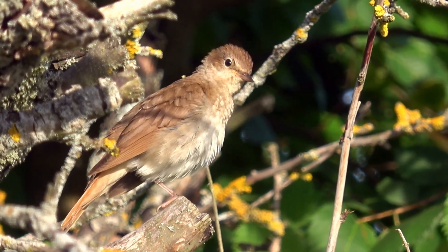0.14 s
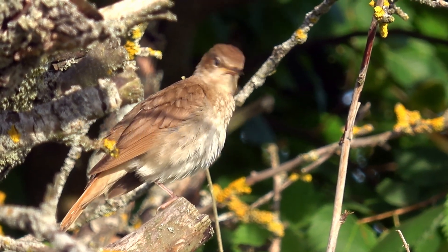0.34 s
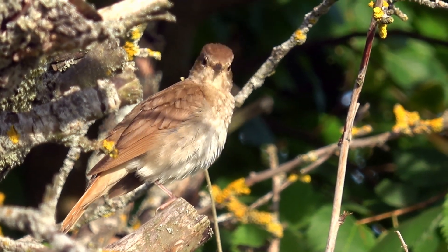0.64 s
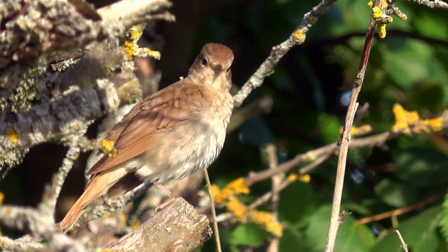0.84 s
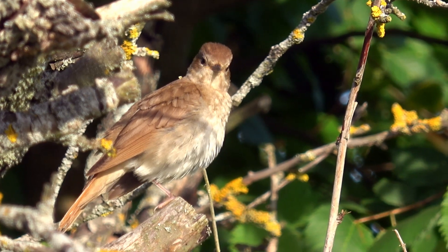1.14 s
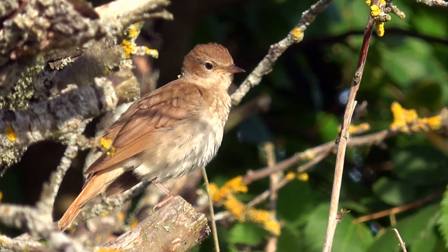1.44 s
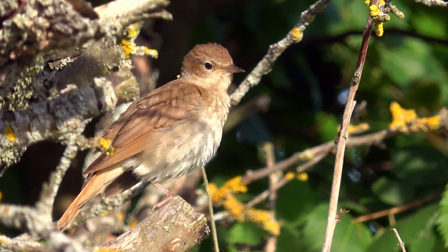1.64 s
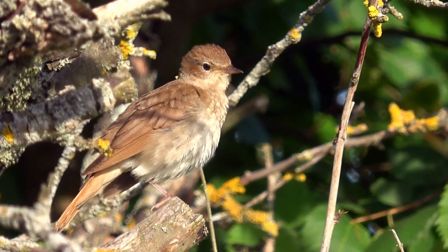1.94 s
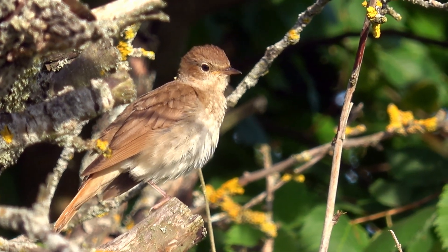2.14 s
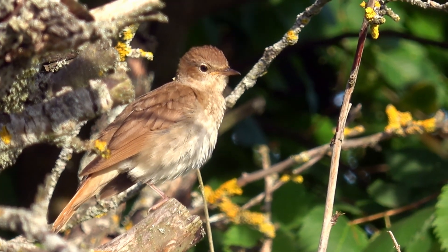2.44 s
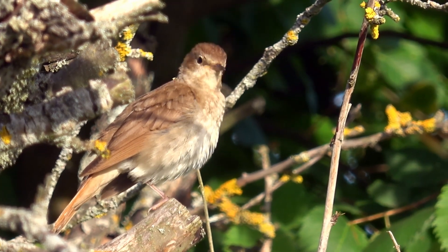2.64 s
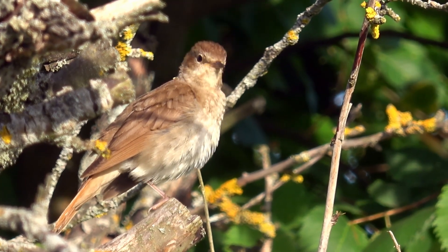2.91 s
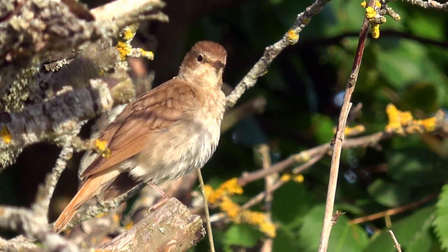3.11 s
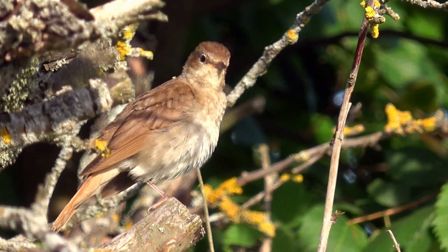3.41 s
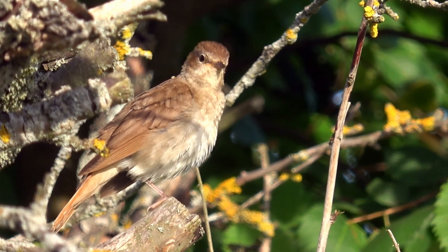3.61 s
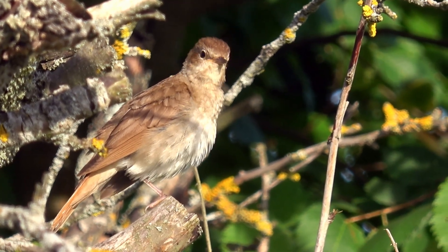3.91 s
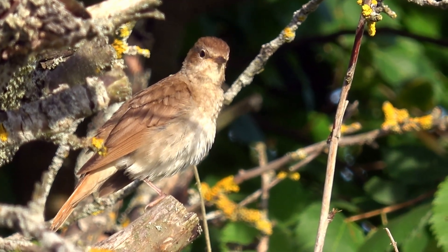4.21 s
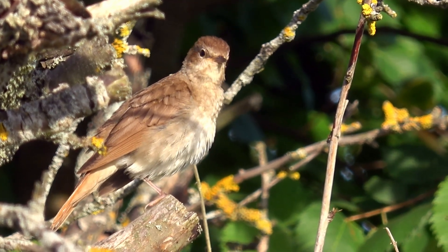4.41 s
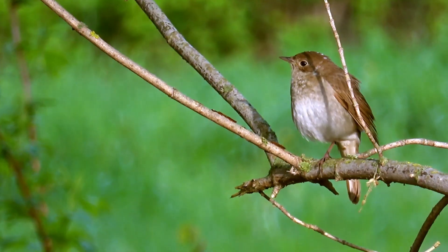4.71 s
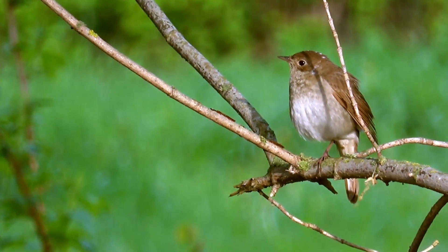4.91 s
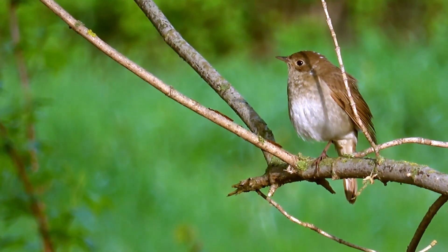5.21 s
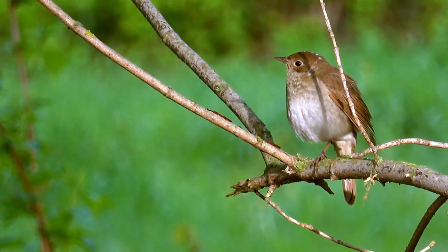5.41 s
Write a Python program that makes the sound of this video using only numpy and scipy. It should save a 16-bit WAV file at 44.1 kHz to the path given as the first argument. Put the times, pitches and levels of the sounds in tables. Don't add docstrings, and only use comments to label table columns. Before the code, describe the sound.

Outdoors among trees, a clear stereo microphone catches a foreground songbird giving piercing slurred whistles, sharp clicks and an even machine-like rattle, with gaps between them. Softer neighbours fill the gaps with two-toned notes, raspy chacks and mellow low coos. After the rattle come raspy chups and grumbling calls, falling high seeps on the right, a short leaf gust and small twitters above a rising traffic hum.

```python
import sys
import numpy as np
from scipy import signal
from scipy.io import wavfile
from scipy.ndimage import uniform_filter1d

SR = 44100
rng = np.random.default_rng(int(sys.argv[2]) if len(sys.argv) > 2 else 0)


def unload_wav(signal):
    wavfile.write(
        sys.argv[1],
        SR,
        np.round(np.clip(np.atleast_2d(signal).T, -1, 1) * 32767).astype(np.int16),
    )


def natural_amplitude(level_db):
    exponent = np.asarray(level_db, float) / 20
    return 10 ** exponent


N = 244755
LEAD = 8192


def read(points, hz):
    f, value = np.transpose(points)
    return np.interp(np.log(hz + 1), np.log(f + 1), value)


def evened(x):
    return x / np.sqrt(np.mean(x ** 2) + 1e-20)


def level_curve(points, before_db=None):
    return natural_amplitude(np.interp(np.arange(N) / SR, *np.transpose(points), left=before_db))


def tilt(db):
    return natural_amplitude(np.multiply([[0.5], [-0.5]], db))


def wander(count, size, pool):
    return evened(uniform_filter1d(rng.standard_normal(pool), size=size))[:count]


def silence():
    return np.zeros(N + LEAD)


def add(mix, s, sound):
    part = mix[round(s * SR) + LEAD:][:len(sound)]
    part += sound[:len(part)]


# frequency in Hz, left-right likeness from 0 to 1.
EAR_LIKENESS = [(30, 0.99), (70, 0.93), (105, 1), (150, 0.48), (380, 0.82), (950, 0.87), (2400, 0.89),
                (6000, 0.48), (15000, 0.42)]


def air(spectrum, patchy_db, likeness=1, size=1024):
    frames, hz = 4 * N // size + 5, np.fft.rfftfreq(size, 1 / SR)
    a, b, c, d, patches = rng.standard_normal((frames, len(hz), 5)).T
    patches = uniform_filter1d(patches, size // 72, 0)
    patches = evened(uniform_filter1d(patches, 12288 // size, 1))
    same = np.clip(likeness * read(EAR_LIKENESS, hz), 0, 1)[:, None]
    left = a + 1j * b
    right = same * left + np.sqrt(1 - same ** 2) * (c + 1j * d)
    z = np.array([left, right]) * natural_amplitude(read(spectrum, hz)[:, None] + patchy_db * patches)
    return evened(signal.istft(z, nperseg=size, noverlap=size * 3 // 4)[1][:, :N])


# frequency in Hz, level in dB per Hz.
HUM_SPECTRUM = [(18, -16), (35, -0.5), (56, 3), (97, -7), (170, -13), (300, -10.5), (677, -4), (936, -9),
                (1260, -7.5), (1840, -18), (3700, -20), (5100, -25), (8000, -23.5), (16000, -29)]
# time in seconds, level in dB.
HUM_FADE = [
    (4.1, -6.5),
    (4.7, -11.5),
    (5.55, -9),
]


def traffic_hum():
    return natural_amplitude(-49.5) * level_curve(HUM_FADE) * air(HUM_SPECTRUM, 0.59, size=4096) * tilt(0.8)


# frequency in Hz, level in dB per Hz.
SWELL_SPECTRUM = [(18, -41), (30, -4), (93, 0.5), (197, -14.5), (536, -1.5), (1110, 1), (1880, -10),
                  (3430, -7), (5660, -16), (7640, -27), (12000, -73), (15600, -69), (22000, -120)]
# time in seconds, level in dB.
SWELL_LEVEL = [
    (4.15, -65.5),
    (4.34, -56),
    (4.97, -48.5),
    (5.55, -48.5),
]


def traffic_swell():
    return natural_amplitude(2.5) * level_curve(SWELL_LEVEL, -99) * air(SWELL_SPECTRUM, 0.93, size=4096) * tilt(-1.6)


# frequency in Hz, level in dB per Hz.
LEAVES_SPECTRUM = [(880, -18), (1500, 2.5), (2360, 4), (5400, 4), (6550, -2.5), (8020, -12.5),
                   (9910, -19.5), (15000, -28)]
# time in seconds, level in dB.
GUST_LEVEL = [
    (4.2, -58),
    (4.6, -69),
    (4.8, -49),
    (4.95, -45.5),
    (5.0, -38),
    (5.06, -41.5),
    (5.15, -49),
    (5.3, -60),
    (5.55, -92),
]


def gust_in_leaves():
    return level_curve(GUST_LEVEL, -99) * air(LEAVES_SPECTRUM, 1.8, likeness=1.1) * tilt(-3.6)


# frequency in Hz, level in dB per Hz.
CHORUS_SPECTRUM = [(1800, -3.5), (2600, -2), (3700, 2), (4800, -3), (6500, -10), (8000, -23)]
# time in seconds, level in dB.
CHORUS_LEVEL = [(0, -51), (.2, -58.5), (.56, -60), (1.0, -55.5), (1.35, -59), (1.7, -62), (2.2, -54),
                (2.45, -58), (3.1, -61.5), (3.9, -63), (4.3, -58.5), (5.55, -82)]


def far_chorus():
    return natural_amplitude(-0.5) * level_curve(CHORUS_LEVEL) * air(CHORUS_SPECTRUM, 5.2)


def resonate(x, hz, width_hz):
    return signal.lfilter(*signal.iirpeak(hz, hz / width_hz, SR), x)


def sing(hz, overtones_db):
    turn = 2 * np.pi * np.cumsum(hz) / SR
    tone = 0
    for k, db in enumerate(overtones_db, 1):
        tone = tone + natural_amplitude(db) * np.sqrt(2) * np.sin(k * turn) * (k * hz < SR / 2)
    return tone


def whistle(rows, overtones_db, follow=0.22):
    s, hz, level_db = np.transpose(rows)
    t = np.arange(s[0], s[-1], 1 / SR)
    hz, level_db = (uniform_filter1d(np.interp(t, s, c), size=160, mode="nearest") for c in (hz, level_db))
    pure = sing(hz, [0])
    upper = (sing(hz, overtones_db) - pure) * natural_amplitude((1 - follow) * (level_db.max() - level_db))
    flutter = 0.84 + 0.45 * wander(len(t), 140, 6000)
    return natural_amplitude(level_db) * (pure + upper * flutter) * signal.windows.tukey(len(t), .1)


def arc(length, start_hz, middle_hz, end_hz, db, overtones_db, soft=0.88, late=1, rough=0.58):
    u = np.linspace(0, 1, round(length * SR))
    v = u ** late
    hz = start_hz * (1 - v) * (1 - 2 * v) + 4 * middle_hz * v * (1 - v) + end_hz * v * (2 * v - 1)
    shake = 1 + rough * wander(len(u), 120, 12000)
    return natural_amplitude(db) * sing(hz, overtones_db) * shake * signal.windows.tukey(len(u), min(soft, 1))


def chack(db, length, hz, width_hz, per_s, rough=1.0):
    t = np.arange(round(length * SR)) / SR
    cycle = t * per_s * (1.05 - .05 * t / length) % 1
    noise = rough * width_hz / 800 * rng.standard_normal(4096)[:len(t)]
    drive = np.exp(-cycle / 0.11) * (noise + np.sin(2 * np.pi * hz * cycle / per_s))
    ring = resonate(resonate(drive, hz, width_hz), hz, 2.5 * width_hz)
    dull = signal.lfilter(*signal.butter(4, max(7500, hz), fs=SR), ring)
    return natural_amplitude(db) * evened(dull) * signal.windows.tukey(len(t), .5)


# start in seconds, length in seconds,
# start pitch in Hz, end pitch in Hz, level in dB.
LEFT_PEEPS = [(0.085, 0.02, 1790, 1840, -54), (0.224, 0.043, 3550, 3880, -67),
              (0.562, 0.012, 2650, 1730, -46.5), (0.576, 0.03, 4120, 3990, -63),
              (0.619, .018, 3520, 3920, -61.5), (0.686, 0.012, 2400, 2840, -55.5),
              (0.808, 0.014, 3430, 3300, -60), (0.836, 0.048, 3320, 3313, -58.5),
              (0.907, 0.022, 3300, 3800, -72), (0.94, .04, 3900, 3950, -80),
              (1.193, 0.036, 2860, 3060, -64), (1.288, 0.11, 3930, 3620, -68),
              (1.834, 0.027, 4460, 4750, -63), (1.834, 0.038, 6200, 6650, -66),
              (1.865, 0.018, 4800, 5050, -59), (1.89, 0.0046, 5000, 5050, -63),
              (1.907, 0.0039, 4900, 4930, -55), (2.244, 0.011, 2880, 2900, -65),
              (3.227, .025, 3560, 4000, -62)]
WARBLE = [(2.644, 0.015, 5740, 5510, -56), (2.668, 0.013, 7370, 5200, -60), (2.686, 0.028, 4140, 6460, -62),
          (2.698, 0.0059, 4800, 6000, -52), (2.875, 0.027, 4430, 6240, -63.5),
          (2.951, 0.043, 8530, 5660, -56.5), (2.979, 0.01, 5600, 7950, -60),
          (3.005, 0.02, 8100, 6400, -64.5), (3.03, 0.01, 4860, 7500, -60), (3.037, 0.023, 4740, 5700, -63)]
RIGHT_PEEPS = [(4.2, 0.06, 4370, 3760, -65), (4.333, 0.053, 3550, 2780, -58), (4.4, 0.024, 4950, 5100, -60),
               (4.472, 0.053, 5130, 5270, -62.5), (4.504, 0.028, 4060, 3620, -52.5),
               (4.552, .018, 2470, 3220, -56.5), (4.567, 0.046, 3350, 3330, -57.5),
               (4.62, 0.024, 3560, 4190, -55), (4.969, 0.068, 9280, 9580, -61),
               (5.179, 0.039, 3450, 3220, -54), (5.215, 0.065, 3410, 3330, -57),
               (5.22, 0.012, 4500, 3530, -49), (5.47, 0.011, 3560, 3300, -53),
               (5.49, 0.025, 6880, 6780, -69),
               (5.212, 0.025, 5900, 5260, -55), (5.293, .01, 3640, 6260, -63),
              (5.304, 0.036, 6220, 5480, -54), (5.33, 0.015, 6300, 7700, -64),
              (5.385, .015, 5650, 6330, -61), (5.396, 0.019, 5900, 4880, -52),
              (5.419, 0.0075, 3250, 4120, -54), (5.46, 0.014, 4970, 6200, -59),
              (5.48, 0.016, 5800, 4700, -50.5), (5.495, 0.011, 3100, 4420, -47.5),
              (5.538, 0.013, 3950, 6200, -60)]


def peeps(notes):
    out = silence()
    for s, length, start_hz, end_hz, db in notes:
        settle = 0.62 + 0.094 * (end_hz < start_hz)
        middle_hz = start_hz + settle * (end_hz - start_hz)
        add(out, s, arc(length, start_hz, middle_hz, end_hz, db, [0], soft=0.25, rough=.24))
    return out


# start in seconds, length in seconds, top pitch in Hz, level in dB.
SEEPS = [
    (4.714, 0.057, 7960, -43),
    (4.821, 0.054, 7870, -40),
    (4.948, .055, 7280, -32),
]
# share of the length, times the top pitch, level in dB.
SEEP_SHAPE = [(0, 0.97, -12), (.2, 0.99, -7), (.66, .9, 0.5), (1, .73, -6.5)]


def seeps():
    out = silence()
    share, pitch, level_db = np.transpose(SEEP_SHAPE)
    for s, length, hz, db in SEEPS:
        add(out, s, whistle(np.transpose([share * length, pitch * hz, level_db + db]), [-1.5, -59]))
    return out


# start in seconds, level in dB, length in seconds.
SCOLD = (3070, 3000, 340), [(.992, -52.5, 0.034), (1.062, -51, 0.03)]
GRUMBLE = (2240, 1200, 450, 1.7), [(4.328, -54.5, 0.023), (4.392, -53, 0.028), (4.472, -51.5, 0.03),
           (4.548, -50, 0.019), (4.624, -51, 0.025), (4.706, -54, 0.019)]
GRUMBLE_TOP = (6000, 5300, 350), [(4.4, -58, 0.015), (4.47, -61, .025), (4.548, -58, 0.02),
               (4.632, -60, 0.0166), (4.71, -61, .02)]
SHARP = (1960, 850, 140), [(4.981, -37, 0.0103), (5.008, -41, 0.017)]
SHARP_TOP = (4740, 730, 710), [(4.982, -37, 0.0083), (5.008, -40, 0.012)]
CHACK = (2950, 1700, 400), [(.746, -51, .02), (2.073, -50, .015), (2.119, -53, .017), (2.165, -57, .025)]
HISS = (4000, 2700, 400), [(.125, -58, 0.046), (.161, -57, 0.026), (.506, -43.5, 0.024),
        (1.228, -62, 0.034)]
TACK = (2250, 800, 180), [(.562, -49, .0087)]
TUT = (1590, 560, 340), [(1.207, -50.5, 0.014), (1.468, -48.5, 0.021), (1.72, -50, 0.014)]
TICK = (6000, 1200, 630), [(2.335, -67, 0.025), (2.397, -58, .015), (2.467, -60, 0.018)]
CHURR = (5100, 1800, 120), [(1.585, -63, 0.067)]
TSK = (9300, 900, 320), [(2.218, -65, .012)]
TRILL = (3700, 330, 62, .4), [(2.146, -60, .09)]
BUZZ = (2900, 420, 75, .5), [(5.325, -54, .066), (5.392, -56, .066)]


def harsh_calls():
    out = silence()
    kinds = (SCOLD, GRUMBLE, GRUMBLE_TOP, SHARP, SHARP_TOP, CHACK, HISS, TACK, TUT, TICK, CHURR, TSK, TRILL, BUZZ)
    for voice, calls in kinds:
        for s, db, length in calls:
            add(out, s, chack(db, length, *voice))
    return out


CHUP = (2600, 950, 340, 1.2), [(3.867, -46, 0.018), (3.903, -49, 0.023), (3.950, -48, 0.019),
        (4.001, -48, 0.019), (4.054, -50, 0.021)]


def chups():
    out = silence()
    voice, calls = CHUP
    for s, db, length in calls:
        add(out, s, chack(db, length, *voice))
        add(out, s + .004, arc(length + .005, 2800, 2810, 2750, db - 3.5, [0], rough=0.23))
    return out


LOW_OVERTONES_DB = [2, -9, -24]
# start in seconds, length in seconds, top pitch in Hz, level in dB.
COOS = [
    (1.245, 0.053, 1310, -48),
    (1.505, 0.0567, 1210, -50.5),
    (1.754, 0.067, 1182, -50),
]
# start in seconds, length in seconds, start, middle and end pitch in Hz, level in dB.
HOOT = (.988, .044, 1080, 1330, 1200, -44.5)


def coos():
    out = silence()
    add(out, HOOT[0], arc(*HOOT[1:], [0, -15, -19], soft=.7, rough=.15))
    for s, length, hz, db in COOS:
        add(out, s, arc(length, .76 * hz, hz, 0.54 * hz, db, LOW_OVERTONES_DB, soft=0.47, rough=0.45))
    return out


# start in seconds, length in seconds, start, middle and end pitch in Hz, level in dB.
CROAK_ENTRY = [
    (3.1105, .0048, 1850, 1560, 1250, -43.5),
]
CROAK = [
    (3.116, .069, 960, 1180, 1190, -47.5),
]
CROAK_GRIT = (1250, 900, 174, .7), [(3.118, -54, .066)]


def croaks():
    out = silence()
    for s, *shape in CROAK_ENTRY:
        add(out, s, arc(*shape, LOW_OVERTONES_DB, rough=0.38))
    for s, *shape in CROAK:
        croak = arc(*shape, [0, -24], soft=.25, late=.6, rough=.25)
        beat = abs(np.sin(np.pi * 87 * (np.arange(len(croak)) / SR - .0045)))
        offbeat = arc(shape[0], *[1.52 * shape[2]] * 3, shape[-1] - 4, [0], rough=0.68)
        add(out, s, beat ** 5 * offbeat)
        add(out, s, croak * (1 - .9 * beat ** 1.3) * np.linspace(.85, 1.15, len(croak)))
    voice, calls = CROAK_GRIT
    for s, db, length in calls:
        add(out, s, chack(db, length, *voice))
    return out


# start in seconds, length in seconds, start, middle and end pitch in Hz, level in dB.
KNOCKS = [
    (.1738, .0036, 2800, 2200, 1600, -40),
    (.1788, .004, 2200, 1900, 1650, -43),
]
CAWS = [
    (2.172, .232, 700, 810, 735, -65.5),
]


def knocks_and_caws():
    out = silence()
    for s, *shape in KNOCKS:
        add(out, s, arc(*shape, [0], soft=0.71, rough=.1))
    for s, *shape in CAWS:
        add(out, s, 1.3 * arc(*shape, [0, 8, -7], soft=.2, rough=.12))
    return out


DUET_PARTIALS = [(1, 0), (0, 1), (2, 0), (1, 1), (4, -1), (3, 0), (-1, 2)]
DUET_PARTIALS_DB = [0.5, 5.5, -11, -6.5, -16, -19, -7]


def duet(db, length, low_hz, high_hz, high_db):
    joins, stops = .22, .8
    u = np.linspace(0, 1, round(length * SR))
    end = np.clip((u - stops) / (1 - stops), 0, 1)
    low_curve = low_hz * (1 - .24 * end ** 1.44)
    high_curve = high_hz * (1 - .07 * np.exp(-(u - joins) / 0.12) - 0.35 * end)
    low, high = (np.cumsum(hz) * 2 * np.pi / SR for hz in (low_curve, high_curve))
    joined = natural_amplitude(high_db) * np.clip((u - joins) / 0.04, 0, 1) * np.clip(1 - 0.83 * end, 0, 1)
    bright = natural_amplitude(9.4 * np.clip((u - stops) / 0.059 + 1, 0, 1))
    mix = 0
    for (a, b), g in zip(DUET_PARTIALS, DUET_PARTIALS_DB):
        partial = natural_amplitude(g) * np.sin(a * low + b * high)
        mix = mix + partial * (joined if b else 1) * (bright if a == 2 else 1)
    hoarse = 1 + .32 * wander(len(u), 50, 4096)
    note = natural_amplitude(db) * mix * hoarse * (0.82 + 1.5 * u) * signal.windows.tukey(len(u), .25)
    rasp = chack(db + 6, 0.018, 4700, 2900, 350)
    start = int(0.87 * len(u))
    return np.pad(note, (0, len(rasp))) + np.pad(rasp, (start, len(u) - start))


# start in seconds, level in dB, length in seconds, low voice in Hz, high voice in Hz.
DUETS = [
    (0.103, -52, 0.04, 3136, 4100),
    (0.412, -55, 0.041, 3115, 4185),
    (1.628, -53.5, 0.049, 3043, 4190),
    (2.036, -51, 0.024, 3033, 4130),
    (2.565, -52, 0.03, 3070, 3986),
    (3.087, -52.5, 0.037, 3160, 4240),
    (3.849, -53.5, 0.03, 2980, 4180),
]
DUETS_HIGH_DB = [-8, 0.5, -2.5, -4, -3, -3.5, 2.5]


def duets():
    out = silence()
    for (s, *shape), high_db in zip(DUETS, DUETS_HIGH_DB):
        add(out, s, duet(*shape, high_db))
    return out


# time in seconds, pitch in Hz, level in dB.
WHISTLES = [
    [(.265, 5970, -52), (.272, 6360, -50), (.289, 6530, -36), (.299, 6090, -23), (.31, 5090, -26.5),
     (.32, 4700, -25.5), (.33, 4655, -28), (.342, 4727, -31.5), (.354, 4700, -33)],
    [(.663, 6360, -51), (.675, 6560, -52), (.686, 6650, -37), (.697, 5950, -25), (.707, 5180, -28),
     (.715, 4950, -28), (.721, 4850, -18.5), (.731, 4780, -31), (.74, 4760, -54)],
    [(3.906, 4340, -48), (3.912, 5870, -25.5), (3.92, 6760, -35), (3.928, 7060, -46), (3.94, 6580, -29),
     (3.952, 6280, -34), (3.956, 5950, -17), (3.964, 5380, -36), (3.972, 5480, -37)],
]
# start in seconds, length in seconds,
# start, middle and end pitch in Hz, level in dB.
LATE_ECHO = (.046, .041, 4620, 4610, 4600, -54)
# start in seconds, length in seconds, start, middle, end pitch in Hz, level in dB.
LOWER_NOTES = [
    (0.274, 0.05, 3250, 3240, 3500, -59),
    (0.667, 0.028, 3090, 3350, 3540, -54.5),
]


def loud_whistles():
    out, overtones_db = silence(), [0, -35, -37]
    add(out, WHISTLES[0][0][0] - 0.37, natural_amplitude(-6.5) * whistle(WHISTLES[0], overtones_db))
    add(out, LATE_ECHO[0], arc(*LATE_ECHO[1:], [0], rough=0.29))
    for rows in WHISTLES:
        add(out, rows[0][0], whistle(rows, overtones_db))
    for s, *shape in LOWER_NOTES:
        add(out, s, arc(*shape, [1.5, -50, -18]))
    return out


def click(db, length, start_hz, end_hz, throat, rough=.4, bow=1.0):
    u = np.linspace(0, 1, round(length * SR))
    noise = rng.standard_normal(1024)[:len(u)]
    sweep = evened(sing(start_hz * (end_hz / start_hz) ** u ** bow, [-5.5, 6.5, 7, -9.0, -2.5, 4.0]))
    drive = (1 - rough) * sweep + rough * noise
    drive = np.pad(drive * signal.windows.tukey(len(u), .2) * (1.2 - .5 * u), (0, 300))
    ring = sum(natural_amplitude(g) * resonate(resonate(drive, f, w), f, w) for f, w, g in throat)
    return natural_amplitude(db) * ring / np.sqrt(np.sum(ring ** 2) / (len(u) + 100))


# centre in Hz, width in Hz, level in dB.
OPEN_THROAT = [(2530, 1900, -9), (5900, 2140, -1), (11700, 1600, -16)]
NARROW_THROAT = [(3020, 2500, -6), (4950, 260, 1.5), (5810, 710, 1.5), (7000, 1200, -10.5),
                 (11000, 3400, -14)]
# start in seconds, level in dB.
LONG_CLICKS = [
    (1.9212, -28),
    (2.498, -29),
]
# start in seconds, level in dB, length in seconds.
SHORT_CLICKS = [
    (2.703, -36, 0.0038),
    (2.733, -35.5, 0.0042),
    (2.905, -37.5, 0.0037),
    (2.934, -35.5, 0.0044),
    (3.299, -39.5, 0.0027),
    (3.305, -38, 0.0034),
    (3.371, -36.5, 0.00352),
    (3.377, -40, 0.0044),
    (3.439, -42.5, 0.0026),
    (3.444, -35.5, 0.0034),
]


def clicks():
    out = silence()
    for s, db in LONG_CLICKS:
        add(out, s, click(db, .0175, 3390, 1251, OPEN_THROAT, rough=0.5, bow=0.81))
    for s, db, length in SHORT_CLICKS:
        add(out, s, click(db, length, 3300, 2090, NARROW_THROAT, rough=0.67))
    return out


# centre in Hz, width in Hz, level in dB.
RATTLE_THROAT = [(2800, 420, -11), (3800, 1000, 2.5), (4860, 430, 0.5), (6000, 770, -4.5),
                 (10700, 5700, -17.5)]
# time of the click in seconds, level of the click in dB.
RATTLE = [(3.4758, -36.5), (3.4998, -35), (3.5277, -33.5), (3.554, -35.5), (3.5785, -35.5), (3.6051, -38),
          (3.632, -35.5), (3.6581, -36.5), (3.684, -34.5), (3.712, -35.5), (3.7384, -36.5), (3.7646, -38),
          (3.7925, -41)]


def rattle():
    out, full_db = silence(), -31
    tone_hz, cold_throat = np.array([3200, 3630, 3900]), np.array([0.0078, 0.019, 0.12, -0.079, 0])
    first, last = RATTLE[0][0], RATTLE[-1][0]
    drop_hz = np.linspace(3900, 1850, round(0.0038 * SR))
    for s, db in RATTLE:
        cold = np.exp(-((s - first) / 0.06) ** 2)
        shift = (1 + cold * cold_throat) * rng.normal(1, 0.031, len(RATTLE_THROAT))
        throat = [(f * k, w, g) for (f, w, g), k in zip(RATTLE_THROAT, shift)]
        tone_db = full_db - 18 * np.exp(-(s - first) / 0.031) - 1.5 * (s == last)
        pitches = tone_hz * (1 - 0.19 * cold) * rng.normal(1, 0.013)
        tone = arc(.0066, *pitches, tone_db, [0, -29, -21], soft=0.14, rough=0.2)
        add(out, s - .0058, tone * np.linspace(0, 1.1, len(tone)) ** 0.71)
        add(out, s - .0007, click(db + .5, 0.00498, 3600, 2154, throat, rough=0.59))
        drop = sing(drop_hz, [max(tone_db, full_db - 4.5) - 4.5])
        add(out, s + .0005, drop * signal.windows.tukey(len(drop_hz), .6))
    return out


# frequency in Hz, reverberation time (60 dB) in seconds.
TRUNKS_T60 = [(1000, 0.088), (2500, 0.42), (5000, 0.32), (12000, 0.25)]
# left delay in seconds, right delay in seconds, level in dB.
BRANCHES = [
    (.0021, 0.0041, -19.5),
    (.0062, 0.0093, -19),
]


def trees(x, twigs_db, trunks_db, pan_db, thin=0):
    taps = np.zeros((2, 30000))
    at = np.arange(40, 29980, 20) + rng.integers(0, 20, (2, 1497))
    np.put_along_axis(taps, at, rng.choice([-1., 1.], at.shape), 1)
    taps[1] = taps[0]
    taps[1] += signal.lfilter(*signal.butter(2, 6760, "high", fs=SR), np.roll(taps[1], 3333) - taps[1])
    twigs = taps * natural_amplitude(-60 * np.arange(30000) / SR / 0.071)
    hz, t, z = signal.stft(taps, SR, nperseg=128)
    trunks = signal.istft(z * natural_amplitude(-60 * t / read(TRUNKS_T60, hz)[:, None]), SR, nperseg=128)[1][:, :30000]
    echoes = natural_amplitude(twigs_db) * twigs / np.linalg.norm(twigs[0])
    echoes = echoes + natural_amplitude(trunks_db) * trunks / np.linalg.norm(trunks[0])
    for left_s, right_s, db in BRANCHES:
        echoes[[0, 1], [round(left_s * SR), round(right_s * SR)]] += natural_amplitude(db)
    echoes = echoes - thin * signal.filtfilt(*signal.butter(2, 2900, fs=SR), echoes)
    wet = signal.fftconvolve(x[None], echoes, axes=1)
    return ((x + wet[:, :len(x)]) * tilt(pan_db))[:, LEAD:]


# time in seconds, left over right in dB.
TURN = [
    (.45, 1.5),
    (.7, 0.5),
    (1.3, 4),
    (1.5, 1),
]


def scene():
    right_notes = RIGHT_PEEPS
    left = duets() + harsh_calls() + coos() + peeps(LEFT_PEEPS + WARBLE)
    right = seeps() + peeps([note for note in right_notes if note[0] <= 5.15])
    close = peeps([note for note in right_notes if note[0] > 5.15])
    clearing = chups() + croaks() + knocks_and_caws()
    birds = trees(left, -6, -13.0, 0.42) + trees(right, -8.5, -5.5, -4.5)
    birds = birds + natural_amplitude(2.5) * trees(close, -14, -12, -4.5) + trees(clearing, -12, -18, .6)
    birds = birds + trees(loud_whistles() + clicks() + rattle(), -9.5, -9.0, 1.0, thin=0.53)
    birds = birds * tilt(np.interp(np.arange(N) / SR, *np.transpose(TURN)))
    return traffic_hum() + traffic_swell() + gust_in_leaves() + far_chorus() + birds


def top_cut(x):
    return signal.sosfilt(signal.butter(12, 15900, fs=SR, output="sos"), x)


def record(dry):
    edge = signal.firwin(511, 15780, window=("kaiser", 9), fs=SR)
    return top_cut(signal.oaconvolve(dry, edge[None], "same"))


dry = scene()
out = record(dry)
unload_wav(out)
```